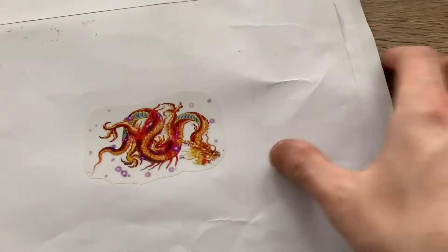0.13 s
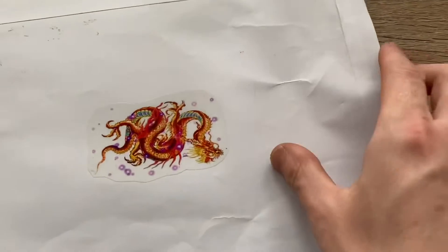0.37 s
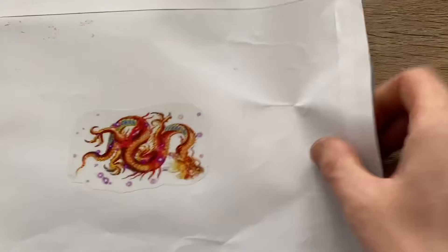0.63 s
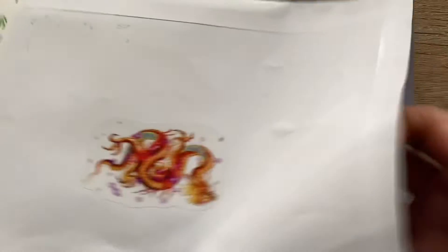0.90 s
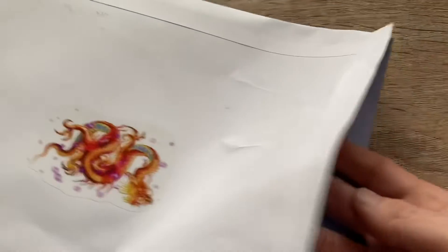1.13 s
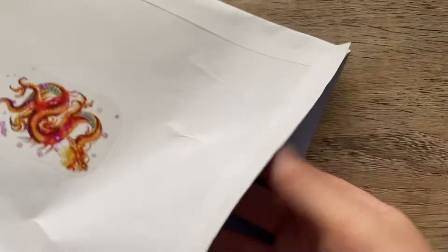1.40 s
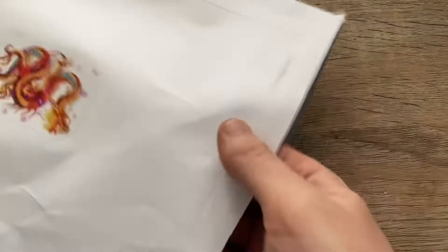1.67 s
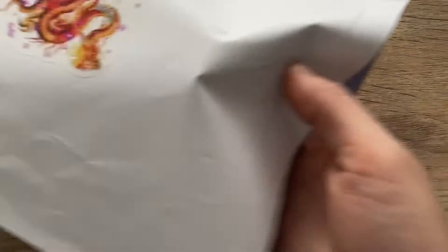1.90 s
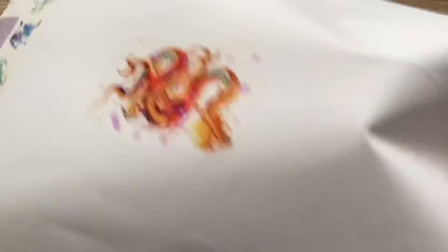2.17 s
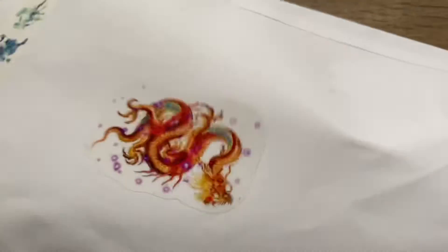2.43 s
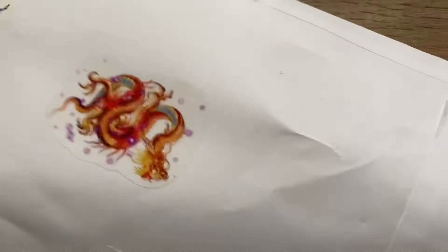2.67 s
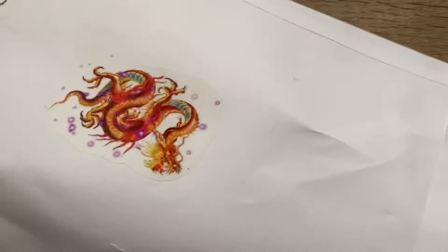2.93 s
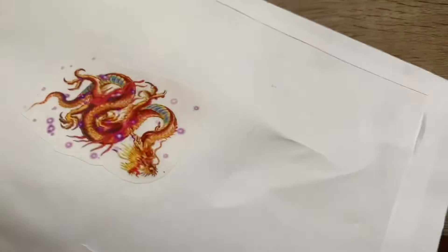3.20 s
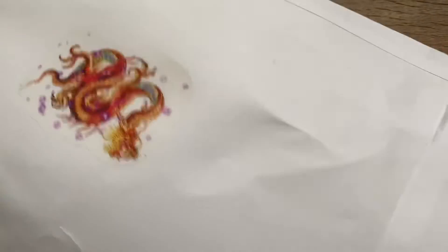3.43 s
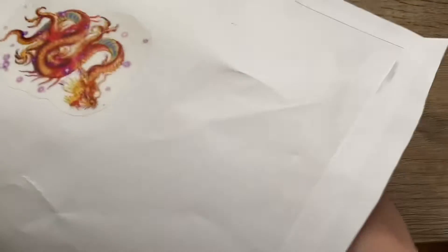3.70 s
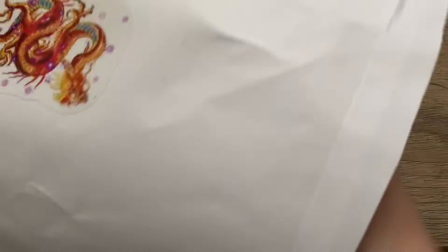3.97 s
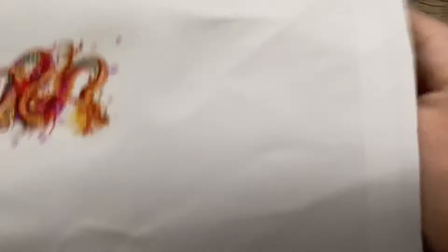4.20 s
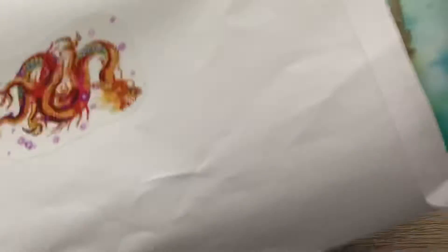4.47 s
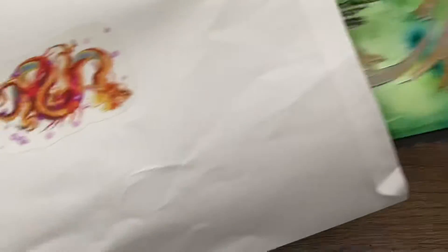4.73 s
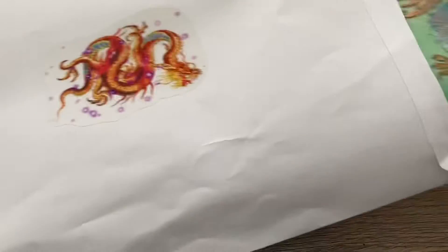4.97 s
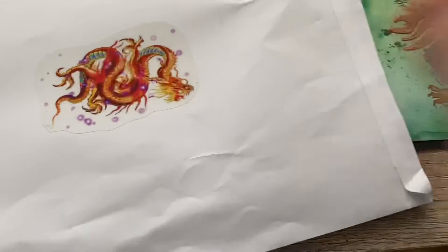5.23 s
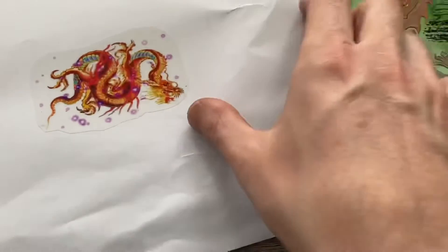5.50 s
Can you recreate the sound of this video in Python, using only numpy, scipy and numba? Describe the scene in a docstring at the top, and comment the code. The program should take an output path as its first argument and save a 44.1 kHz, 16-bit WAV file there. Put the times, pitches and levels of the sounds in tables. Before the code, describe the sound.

A close, dry stereo phone pickup of hands working a large stiff paper envelope on a table in a small quiet room. From 0 to 0.6 s there are only faint rustles and a few light ticks. At about 0.7 to 0.95 s a tight cluster of sharp, loud snaps breaks out as the sheet bends, with low puffing pops beneath. Dry sliding hiss follows, with separate cracks near 1.44, 1.63 and a strong one at 1.74 s. A tiny finger creak squeaks around 1.9 s. From 2 to 4.5 s rubbing is fuller and nearly continuous, with crinkles, low panel flaps and bright snaps, notably near 2.33, 3.06, 3.27 and 4.13 s. After 4.6 s it thins out; by 5.1 s only sparse light snaps and brief soft rubs remain, the last near 5.55 s, over faint low air noise.

```python
"""Hands lift, open and bend a large stiff paper envelope on a wooden table and slide a card out, close to a phone.
Faint rustles and light snaps come first, then loud creases: volleys of slips that ring the sheet.
A finger creaks once, as stick-slip partials, while panels pop as sinking low swings that pump air.
Skin and card rub on as banded noise with crackles, then only sparse light snaps and rubs remain.
Quiet air noise and a short diffuse room tail lie under it all."""
import sys
import numpy as np
from scipy import signal
from scipy.fft import rfft, irfft, next_fast_len
from scipy.io import wavfile
from scipy.ndimage import uniform_filter1d
from numba import njit

SR = 44100
rng = np.random.default_rng(int(sys.argv[2]) if len(sys.argv) > 2 else 0)


def nominal_scale(level):
    """Amplitude ratio for a level in decibels (scalar or array-like)."""
    x = np.asarray(level, float) / 20
    return 10 ** x


def master(y):
    """Save y as 16-bit WAV."""
    cut = np.clip(np.atleast_2d(y).T, -1, 1)
    pcm = np.round(cut * 32767)  # scale
    wavfile.write(sys.argv[1], SR, pcm.astype(np.int16))


N = 247974  # samples


def unit(x):
    """Scale to rms 1."""
    return x / np.sqrt(np.mean(x ** 2))


def peak(x):
    """Scale to peak 1."""
    return x / np.max(np.abs(x))


def fade(t, t60):
    """Exponential decay by 60 dB in t60 seconds."""
    return np.exp(-np.log(1000) * t / t60)


def over_hz(table, size):
    """A (Hz, value) table on the bins of a real transform, straight on a log axis."""
    hz, value = np.transpose(table)
    bins_hz = np.fft.rfftfreq(size, 1 / SR)
    return np.interp(np.log(bins_hz + 1), np.log(hz + 1), value)


def colour(x, table):
    """Filter by a (Hz, dB) table."""
    size = next_fast_len(N)
    return irfft(rfft(x, size) * nominal_scale(over_hz(table, size)), size)[..., :N]


@njit
def svf(x, hz, width):
    """State-variable band-pass whose centre moves every sample; width as a share of the centre."""
    y, b, l = np.empty(len(x)), 0., 0.
    for i in range(len(x)):
        g = np.tan(np.pi * hz[i] / SR)
        v = (b + g * (x[i] - l)) / (1 + g * (g + width))
        b, l, y[i] = 2 * v - b, l + 2 * g * v, width * v
    return y


def svf_twice(x, hz, width):
    """Two equal band-passes in a row, for steeper sides."""
    return svf(svf(x, hz, width), hz, width)


def walk(rate):
    """Random levels held 1 / rate s and slewed twice; rms 1."""
    k = int(SR / rate)
    held = np.repeat(rng.standard_normal(N // k + 1), k)
    return unit(uniform_filter1d(uniform_filter1d(held, k), k)[:N])


def ticks(rate):
    """Sparse fibre clicks of uneven size, on average rate per second."""
    return unit((rng.random(N) < rate / SR) * rng.standard_normal(N))


# Spectrum of the quiet air. Each row: pitch in Hz, relative level in dB per Hz.
AIR_SHAPE = [(18, -30), (30, -23.5), (75, 23), (145, -32), (295, -38.5), (1500, -31.5), (2900, -32),
             (16000, -37)]


def air():
    """Steady coloured noise, mostly shared by the two ports."""
    shared = rng.standard_normal(N)
    own = rng.standard_normal((2, N))
    return nominal_scale(-65.5) * unit(colour(shared + 0.22 * own, AIR_SHAPE))


def room(x):
    """A short diffuse tail, different at each port and duller as it fades."""
    t60, level_db = 0.2, -20.5  # s, tail energy against the direct sound
    t = np.arange(int(.4 * SR)) / SR
    noise = rng.standard_normal((2, len(t)))
    dull = uniform_filter1d(noise, size=9)
    # the bright part dies sooner; nothing returns in the first 3 ms
    tail = (3. * dull * fade(t, t60) + .3 * noise * fade(t, 0.34 * t60)) * (t > .003)
    return nominal_scale(level_db) * signal.fftconvolve(x, unit(tail) / np.sqrt(len(t)), axes=1)[:, :N]


# Phase between the ports. Each row: pitch in Hz, lead of the left port in radians.
PORT_LEAD = [(100, .4), (3000, .5), (4000, 0), (6800, 0)]
# Shading by the phone. Each row: pitch in Hz, left minus right in dB.
PORT_SHADE = [(60, -0.5), (250, 5.5), (800, 8), (2400, 8.5), (4400, 4), (7000, 0.8)]


def ports(x):
    """The phone shades one port in the middle pitches; treble bends round the case and reaches the left late."""
    treble_late_s = .000233
    size = next_fast_len(N)
    side = np.array([[.5], [-.5]])
    above_hz = np.maximum(np.fft.rfftfreq(size, 1 / SR) - PORT_LEAD[-1][0], 0)
    late = 2 * np.pi * treble_late_s * above_hz
    shade = nominal_scale(side * over_hz(PORT_SHADE, size))
    turn = shade * np.exp(1j * side * (over_hz(PORT_LEAD, size) - late))
    return irfft(rfft(x, size) * turn, size)[:, :N]


def settle(base_db, events, under_db, t60):
    """The sheet settles: a fading burst after each event adds in power to the handling level."""
    kicks = np.zeros(N)
    at = [int(event[0] * SR) for event in events]
    np.add.at(kicks, at, [nominal_scale(2 * (event[1] + under_db)) for event in events])
    spread = uniform_filter1d(kicks, size=200, origin=99)  # softens each onset over 200 samples
    bursts = signal.lfilter([1], [1, -fade(2 / SR, t60)], spread)
    return 10 * np.log10(nominal_scale(2 * base_db) + np.abs(bursts))


# Handling moves, joined by straight lines, before the settling bursts.
# Each row: time in seconds, paper rustle in dB, slide hiss in dB, sheet rumble in dB.
HAND_MOVES = [(0, -54.5, -66, -43), (0.116, -64, -65, -62), (0.3, -77, -75, -60), (0.506, -78, -71, -78),
              (0.52, -48.5, -52.5, -53.5), (0.7, -55.5, -49, -42.5), (0.921, -59, -39, -65),
              (1.123, -51.5, -49, -41.5), (1.364, -58, -38.5, -53), (1.685, -53, -52, -42),
              (2.006, -44.5, -42.5, -43.5), (2.2, -40.5, -40.5, -41), (2.47, -42, -53, -38.5),
              (2.78, -40.5, -48, -34), (3.033, -40, -39, -44), (3.235, -47, -51.5, -41.5),
              (3.525, -43.5, -43, -44), (3.768, -57, -53.5, -50.5), (3.977, -36, -41.5, -39.5),
              (4.06, -53.5, -62, -38), (4.098, -46, -43.5, -36.5), (4.41, -42.5, -42.5, -38),
              (4.601, -47, -44, -47), (4.7, -46, -46, -54), (5.003, -55, -54.5, -60),
              (5.106, -51.5, -54, -65), (5.134, -76, -61, -65.5), (5.383, -84.5, -104, -74),
              (5.399, -62, -55.5, -65.5), (5.5, -81, -68, -63.5), (5.548, -53, -51, -58),
              (5.622, -69, -69.5, -57)]


def handling_levels():
    """How hard the hands work the paper: rustle, hiss and rumble levels in dB."""
    s, *columns = np.transpose(HAND_MOVES)
    rustle_db, hiss_db, rumble_db = (np.interp(np.arange(N) / SR, s, c) for c in columns)
    rustle_db = settle(rustle_db, CREASE_SNAPS, under_db=-27, t60=0.23)
    rumble_db = settle(rumble_db, PANEL_POPS, under_db=-15, t60=0.3)
    return rustle_db, hiss_db, rumble_db


def friction(shape, grain_db, rate, flicker_db):
    """Friction noise with tiny crackles; each pitch range has its own crackles and partly its own pressure."""
    press = walk(30)
    low = np.min(np.transpose(shape)[0])
    out = 0
    for hz in np.minimum(low * 2 ** np.arange(.5, 4, .7), 14000.):
        centre = np.full(N, hz)
        crackle = unit(svf(ticks(rate), centre, 0.81))
        grit = unit(svf(rng.standard_normal(N), centre, 0.88))
        band = svf(grit + nominal_scale(grain_db) * crackle, centre, 1.0)
        out = out + unit(band) * nominal_scale(flicker_db * (press + 1.84 * walk(45)))
    # equal bands per octave slope down per Hz; this tilt levels them first
    tilt = [(0, 10 * np.log10(hz / low)) for hz, _ in shape]
    return unit(colour(out, np.array(shape) + tilt))


# Spectra of skin on paper, of the sliding card and of the low sheet rumble.
# Each row of the three: pitch in Hz, relative level in dB per Hz.
RUSTLE_SHAPE = [(300, 12), (500, 3.5), (800, 4.5), (1100, -4.5), (1600, 3), (2400, -0.5), (3500, -7),
                (5000, -0.5), (8000, -4)]
HISS_SHAPE = [(2500, 8.5), (4500, -2), (6000, -2), (8000, 2.5), (11000, -2.5), (14000, -5), (16500, -20)]
RUMBLE_SHAPE = [(20, -35), (40, 5), (70, 3.5), (110, 2.5), (200, -6), (350, -10.5), (600, -51)]


def rubbing(rustle_db, hiss_db, rumble_db):
    """Skin and card rub the paper: three friction layers ride the handling levels."""
    rustle = nominal_scale(rustle_db) * friction(RUSTLE_SHAPE, grain_db=-4.0, rate=260., flicker_db=2.15)
    hiss = nominal_scale(hiss_db) * friction(HISS_SHAPE, grain_db=-6.0, rate=450.0, flicker_db=2.31)
    rumble = nominal_scale(rumble_db) * friction(RUMBLE_SHAPE, grain_db=-12., rate=30., flicker_db=1.1)
    return rustle + hiss + rumble


# Rubbing unrelated between the ports. Each row: pitch in Hz, gain in dB.
PORT_SPREAD = [(60, -27), (300, -10), (1400, -3), (3000, -3), (5500, -2), (7500, -32)]


def wide_rubbing(levels):
    """The sheet is wide, so each port also hears rubbing of its own: smooth noise, no crackles."""
    own = rng.standard_normal((3, 2, N))
    shapes = (RUSTLE_SHAPE, HISS_SHAPE, RUMBLE_SHAPE)
    wide = sum(nominal_scale(db) * unit(colour(noise, shape)) for db, noise, shape in zip(levels, own, shapes))
    return colour(wide, PORT_SPREAD)


# A finger sticking and slipping.
# Each row: time in seconds, mean slip rate in Hz, level in dB ahead of partial gains, wobble and fades.
FINGER_SLIPS = [(1.855, 203, -53.5), (1.867, 174.5, -31.5), (1.883, 232, -36.5), (1.905, 212, -43),
                (1.95, 209, -35)]


def creak():
    """A fingertip sticks and slips at a wandering rate, heard as three harmonic partials."""
    s, hz, db = np.transpose(FINGER_SLIPS)
    t = np.arange(N) / SR
    slip_hz = np.interp(t, s, hz) * (1 + .012 * walk(90))
    phase = 2 * np.pi * np.cumsum(slip_hz) / SR
    tone = nominal_scale(4) * np.sin(phase)
    tone = tone + nominal_scale(10.5) * np.sin(2 * phase + 1.7) + nominal_scale(7.5) * np.sin(3 * phase + 1.7)
    gate = np.clip(np.minimum(t - s[0], s[-1] - t) / 0.045, 0, 1)  # 45 ms in and out
    return tone * nominal_scale(1.5 * walk(150)) * gate * nominal_scale(np.interp(t, s, db))


# Panels popping. Each row: time in seconds, peak in dB at the source, nominal swing in Hz.
PANEL_POPS = [(0.237, -46, 80), (0.323, -48, 48.4), (0.811, -26, 207), (0.877, -17, 113.4),
              (0.931, -23.5, 160.7), (1.092, -15.5, 87.4), (1.402, -28, 99), (1.434, -16.5, 78.5),
              (1.599, -25, 101), (1.739, -28, 154), (1.764, -24, 85), (1.983, -27.5, 118),
              (2.07, -18.5, 107), (2.271, -28.5, 97), (2.329, -12.5, 90.3), (2.407, -23, 114),
              (2.485, -19.5, 99), (2.55, -25.5, 107), (2.642, -32, 62), (2.709, -20.5, 97.5),
              (2.918, -26, 93), (3.065, -20.5, 101), (3.383, -27.5, 64.3), (3.52, -22.5, 81),
              (3.651, -26, 101), (3.816, -17, 106.6), (3.926, -14.5, 79.4), (4.128, -15, 225.5),
              (4.256, -18, 87), (4.293, -18, 91), (4.32, -31, 70), (5.088, -46, 39.9), (5.203, -45.5, 59.6),
              (5.401, -48.5, 97), (5.549, -39, 98)]


def flaps():
    """A panel pops from one bend to another and pumps air: a few slow swings that sink in pitch."""
    length_swings = 2.87  # nominal length in swings
    t = np.arange(8192) / SR
    out = np.zeros(N + len(t))
    for (s, db, hz), chance in zip(PANEL_POPS, rng.standard_normal((len(PANEL_POPS), len(t) + 1))):
        ms = 1000 * length_swings / hz
        swell = (1 - np.exp(-t / (0.00019 * ms))) ** 2 * np.exp(-t / (0.00053 * ms))
        pitch = hz * (0.824 + 1.61 * fade(t, 0.0616))
        # the panel may pop either way
        swing = np.sin(2 * np.pi * np.cumsum(pitch) / SR + np.pi * (chance[0] > 0))
        wobble = nominal_scale(-12) * unit(svf(chance[1:], 1.8 * pitch, 0.57))
        at = int((s - .004) * SR)  # the swell starts 4 ms ahead of the listed time
        out[at:at + len(t)] += nominal_scale(db) * peak(swell * (swing + wobble))
    return out[:N]


def small_snaps(rustle_db, count):
    """Chance snaps, as crease rows, whose strength follows the rustle."""
    over_db, extra_db = 8.5, 7.5  # least rise over the rustle, and random rise on top
    middle_hz, crack_db, middle_ms = 1300, -19, 9.3
    when, size, tone, length = rng.random((count, 4)).T
    s = when * (N - 1) / SR
    db = rustle_db[(s * SR).astype(int)] + over_db + extra_db * size
    hz = middle_hz * 2 ** (1.6 * (tone - .5))
    return list(zip(s, db, hz, np.full(count, crack_db), middle_ms * (.5 + length)))


# Broad resonances of the paper pocket. Each row: pitch in Hz, width in Hz, gain in dB.
POCKET_MODES = [(780, 300, 22), (1550, 220, 24.5), (2250, 100, 7), (3650, 300, -17.5), (5200, 1300, -49)]


def pocket(x):
    """The paper pocket answers with its broad resonances, side by side."""
    return sum(nominal_scale(db) * svf(x, np.full(len(x), 1. * hz), width / hz) for hz, width, db in POCKET_MODES)


# Creases giving way. Each row: time in seconds, body peak in dB at the source, nominal ring in Hz,
# crack in dB relative to the body, nominal length in ms.
CREASE_SNAPS = [(0.047, -40.5, 1520, -18, 7.5), (0.139, -42.5, 1530, -20, 5.8), (0.24, -47, 940, -3, 6.7),
                (0.311, -45, 3040, -3, 3.1), (0.336, -33, 1230, -56, 3), (0.656, -28, 1680, -19, 9.4),
                (0.672, -27.5, 670, -13, 6.8), (0.736, -20, 2380, -20.5, 5.6),
                (0.792, -23.5, 1700, -22.5, 9.1), (0.807, -12, 2140, -27.5, 2.3),
                (0.823, -19.5, 1320, -15.5, 5.4), (0.867, -19, 4000, -23, 73), (0.877, -6.5, 2000, 1, 6.8),
                (0.88, -12, 1180, -14, 7.1), (0.928, 0.5, 2010, -17, 2.8), (0.94, -8, 1720, -11, 5.7),
                (1.039, -23.5, 1880, -18, 7), (1.085, -21, 1720, -18, 8), (1.087, -21.5, 420, -23.5, 6.2),
                (1.205, -29, 1580, -18, 6.2), (1.44, -11, 2130, -14, 8.3), (1.592, -28, 1390, -20, 9.7),
                (1.628, -9, 2250, -44.5, 2.8), (1.657, -34, 2100, -12.5, 3.5),
                (1.694, -25.5, 1550, -27, 12), (1.71, -19, 1030, -8.5, 8.7), (1.736, -1.5, 1870, -25, 6.13),
                (1.761, -22, 915, -17.5, 13), (1.771, -20.5, 1070, -26, 11), (1.781, -22.5, 840, -25.5, 16),
                (1.875, -11.5, 1320, -26.5, 4.3), (1.976, -26.5, 2400, -9.5, 7.3),
                (2.055, -11.5, 1470, -20.5, 6.5), (2.069, -23, 840, -22, 19), (2.278, -24.5, 593, -3, 5.7),
                (2.315, -14, 560, -11.5, 20), (2.327, -6.5, 1550, -6, 5.9), (2.327, -6, 4100, -9.5, 5.2),
                (2.401, -17.5, 1300, -26, 6.9), (2.503, -13.5, 1350, -41, 4.1),
                (2.521, -19.5, 730, -28.5, 14), (2.568, -11, 1430, -32.5, 3.7),
                (2.577, -20.5, 780, -15, 10.6), (2.634, -22.5, 930, -4.5, 7), (2.837, -22, 396, -11.5, 4.7),
                (2.924, -24.5, 740, -28, 15), (2.929, -19, 1540, -24, 5.2), (2.937, -10.5, 1570, -29, 1.95),
                (2.967, -24, 1640, -24.5, 13), (3.062, -5, 985, -26.5, 5.1), (3.066, -7.5, 2930, -19, 4),
                (3.089, -21.5, 2270, -6.5, 5.9), (3.242, -20, 810, -22.5, 8.3), (3.265, -8, 2560, -32, 5.3),
                (3.27, -6.5, 12100, -28, 4), (3.398, -18.5, 2380, -23.5, 4.6),
                (3.83, -12, 1930, -20.5, 4.1), (3.867, -31.5, 786, -3, 11), (3.924, -15, 830, -17, 15.6),
                (3.938, -17, 1550, -27.5, 10), (3.97, -24, 2170, -1, 12.5), (4.038, -23, 1700, -28, 6.4),
                (4.128, -4.5, 1034, -25, 7.7), (4.138, -20.5, 780, -25, 8.5), (4.261, -26, 930, -17, 9),
                (4.29, -15.5, 756, -15, 9.4), (4.297, -13, 1930, -15, 7.8), (4.308, -23.5, 895, -22, 15),
                (4.363, -20.5, 1300, -28, 4.4), (4.427, -22.5, 2250, -2.5, 10.2),
                (4.513, -27, 780, -13, 17), (4.544, -27, 600, -11.5, 12), (4.701, -34.5, 1260, -10.5, 5.7),
                (5.064, -31, 1920, -9.5, 8.5), (5.088, -33.5, 1070, -7.5, 24),
                (5.172, -34.5, 2650, -6, 2.44), (5.195, -42.5, 1876, -10, 7.5),
                (5.396, -43, 1158, -23, 2.6), (5.52, -31, 2600, -24, 1.7), (5.549, -38, 3180, -14, 14)]


def snaps(rows):
    """A crease gives way in a volley of slips; its patch rings at two pitches and the pocket answers."""
    # a low patch wakes a higher neighbour, a high patch a lower one
    split_hz, neighbour_hz, neighbour_down = 1650, 2180, 0.68
    size = 2048
    crack_hz = np.full(size, 6200)
    t = np.arange(size) / SR
    out = np.zeros((2, N + size + 16))
    for (s, db, hz, crack_db, ms), chance in zip(rows, rng.standard_normal((len(rows), 2, size))):
        second_hz = neighbour_hz if hz < split_hz else hz * neighbour_down
        volley = (1 - np.exp(-t / (.00007 * ms))) * np.exp(-(t / (0.00072 * ms)) ** 1.14)
        slips = chance[0] * np.abs(chance[0]) * volley
        # one early slip stands out, more so in a short snap
        slips[int(.0001 * ms * SR)] += 32.0 / ms
        # bending waves carry the high pitches faster, so the ring sinks
        sink = 0.89 + 0.12 * volley
        main = svf_twice(slips, hz * sink, .7)
        second = svf_twice(slips, second_hz * sink, .7)
        body = peak(peak(main) + nominal_scale(-8) * peak(second) + nominal_scale(-15.0) * peak(pocket(slips)))
        tail = nominal_scale(-36.0) * unit(pocket(chance[1])) * fade(t, 0.085) * (1 - fade(t, 0.041))
        crack = peak(svf_twice(chance[1] * volley ** 1.3, crack_hz, 1.3))
        # each crease lies elsewhere on the sheet: slightly different delay and level at each port
        place = np.clip(chance[1, 0], -2, 2)
        at = int(s * SR)
        for port, side in enumerate((.5, -.5)):
            late = 6 + int(round(side * place * 1.4))  # samples; 6 is trimmed off below
            out[port, at + late:at + late + size] += nominal_scale(db + side * place * 1.0) * (body + tail)
            out[port, at + 6:at + 6 + size] += nominal_scale(db + crack_db) * crack
    return out[:, 6:N + 6]


def scene():
    """Everything the hands do, heard at two ports in the room."""
    levels = handling_levels()
    creases = CREASE_SNAPS + small_snaps(levels[0], count=80)
    near = rubbing(*levels) + creak() + flaps() + snaps(creases)
    return ports(near + wide_rubbing(levels) + room(near)) + air()


def band_limit(x):
    """A steep low-pass at the top of the band."""
    return signal.sosfilt(signal.butter(12, 16850, fs=SR, output="sos"), x)


def record(dry):
    """The phone rounds the loudest peaks by soft saturation."""
    mix = np.tanh(0.7 * dry) / 0.83
    return band_limit(mix)


dry = scene()
out = record(dry)
master(out)
```